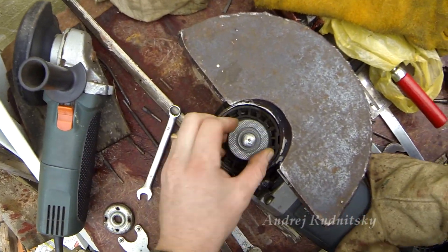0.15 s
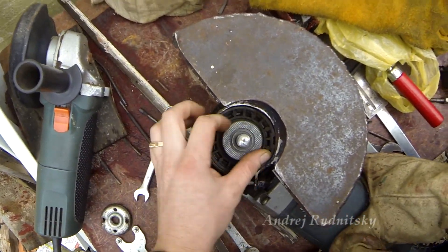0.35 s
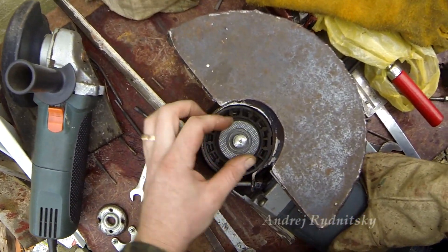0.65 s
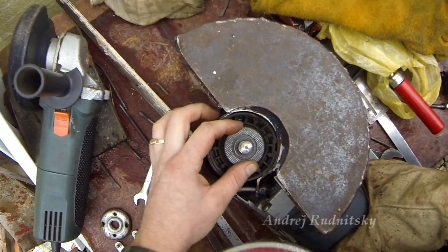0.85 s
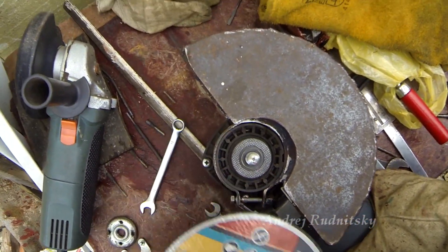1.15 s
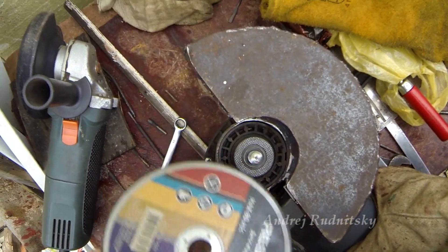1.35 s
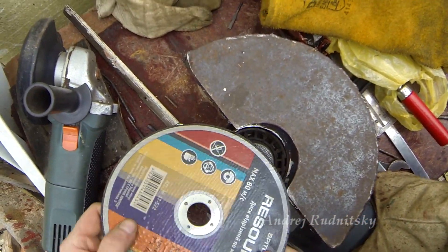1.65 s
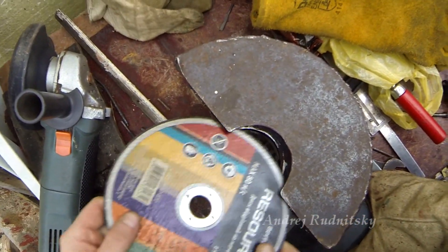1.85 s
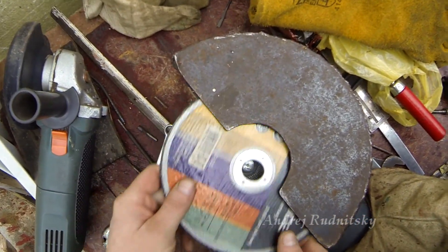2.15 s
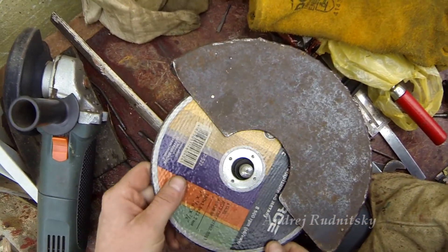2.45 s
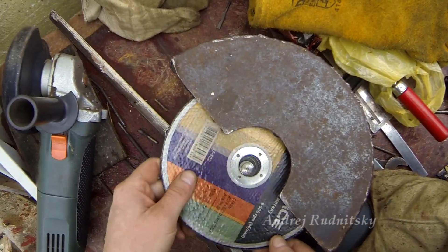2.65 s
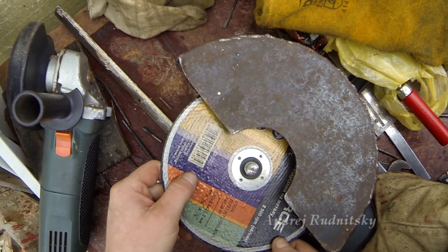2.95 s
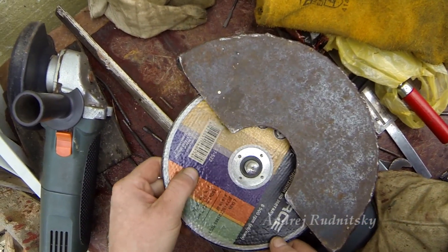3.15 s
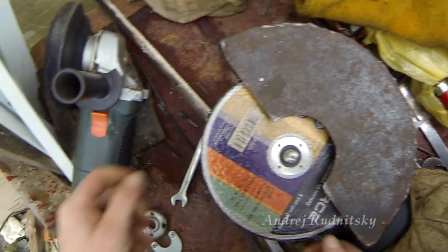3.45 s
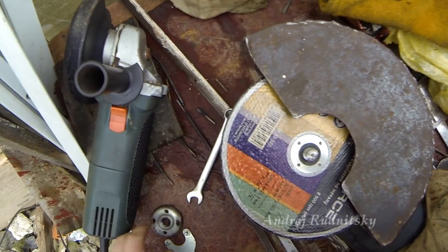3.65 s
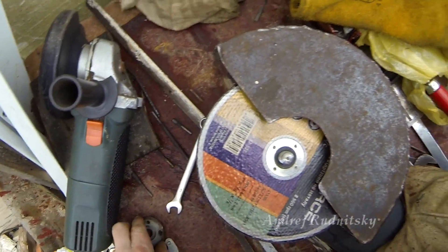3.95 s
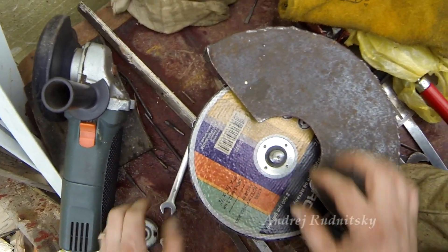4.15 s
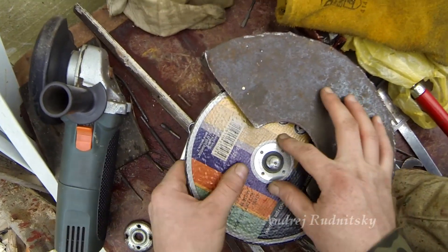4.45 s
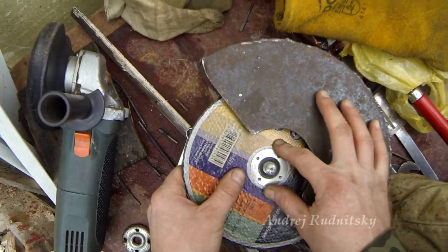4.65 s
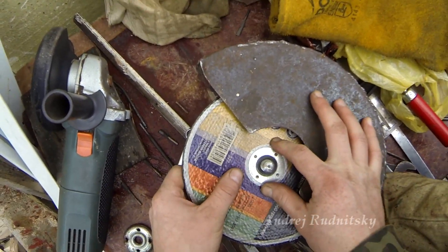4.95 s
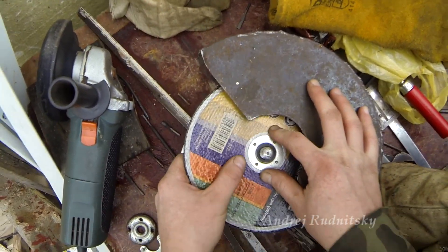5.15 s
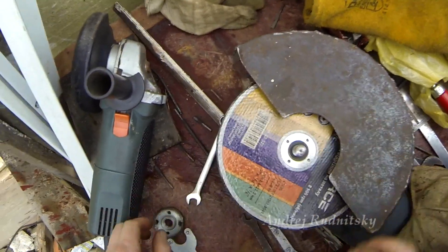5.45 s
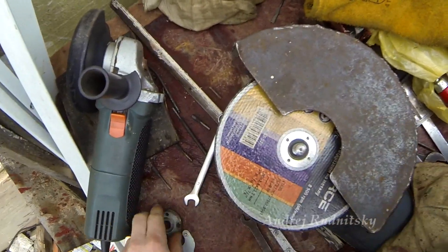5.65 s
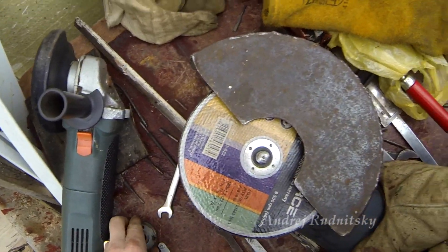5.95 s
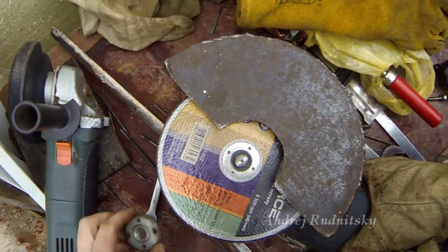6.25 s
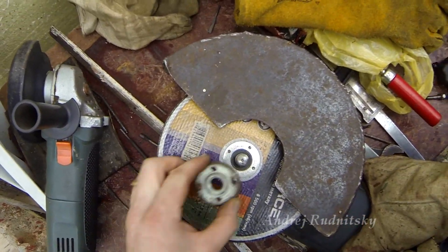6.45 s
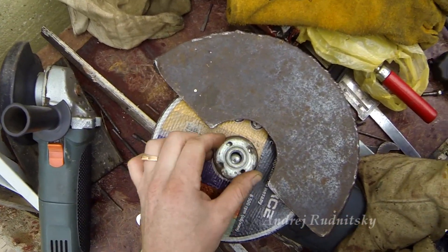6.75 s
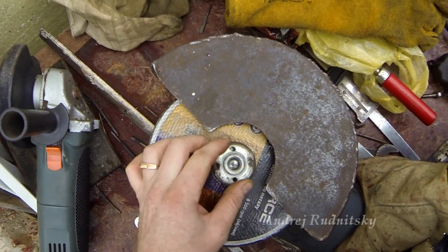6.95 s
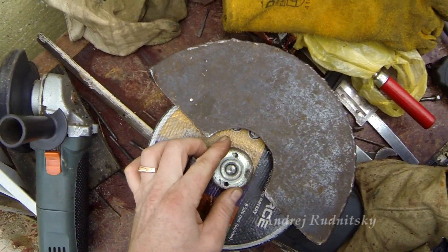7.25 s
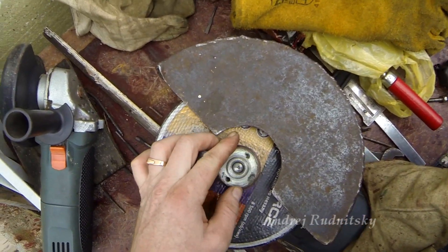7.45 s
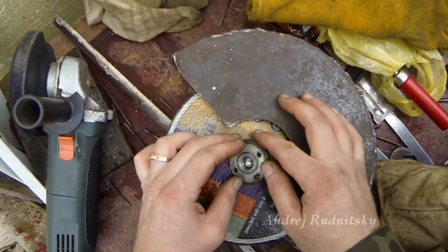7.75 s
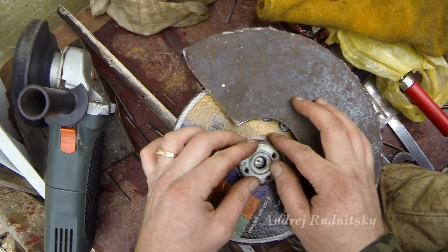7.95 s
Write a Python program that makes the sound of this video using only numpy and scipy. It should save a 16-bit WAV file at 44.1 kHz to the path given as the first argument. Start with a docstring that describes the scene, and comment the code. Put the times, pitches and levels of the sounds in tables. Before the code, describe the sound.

Close up, a steel flange clinks onto a grinder spindle, a cutting disc scrapes and snaps into place, then a nut rattles on.

```python
"""A steel flange clinks onto an angle grinder's spindle, heard from close by; the tool lies on a bench.
A cutting disc scrapes in under the guard and snaps onto its seat; a nut is picked up and turned on.
Blows are noisy force pulses through short resonances, most with a ringing sheet-steel guard; rubs are
dense random slips through resonances. Rattle, cloth, a short room tail, air, hum and whine are added.
"""
import sys
import numpy as np
from scipy import signal
from scipy.fft import rfft, irfft, next_fast_len
from scipy.io import wavfile
from scipy.ndimage import map_coordinates

SR = 44100
rng = np.random.default_rng(int(sys.argv[2]) if len(sys.argv) > 2 else 0)


def master(y):
    """Save y as 16-bit WAV."""
    cut = np.clip(np.atleast_2d(y).T, -1, 1)
    pcm = np.round(cut * 32767)  # scale
    wavfile.write(sys.argv[1], SR, pcm.astype(np.int16))


N = 357651
RING_TIME_S = np.arange(SR // 2) / SR


def amp(db):
    """Decibels to gain."""
    return 10 ** (np.asarray(db) / 20)


def unit(x):
    """Scale to rms 1."""
    return x / np.sqrt(np.mean(x ** 2) + 1e-20)


def along(points, hz):
    """Interpolate (f/Hz, value) points on a log axis."""
    f, v = np.transpose(points)
    return np.interp(np.log(hz + 1), np.log(f + 1), v)


def filtered(x, response):
    """Apply a complex response of frequency to x."""
    size = next_fast_len(len(x) + SR // 4)
    spectrum = rfft(x, size)
    return irfft(spectrum * response(np.fft.rfftfreq(size, 1 / SR)), size)[:len(x)]


def shaped_noise(curve):
    """White noise shaped by (f/Hz, level/dB) points, at rms 1."""
    return unit(filtered(rng.standard_normal(N), lambda hz: amp(along(curve, hz))))


def band(x, lo_hz, hi_hz):
    """Causal band-pass."""
    return signal.sosfilt(signal.butter(3, [lo_hz, hi_hz], "band", fs=SR, output="sos"), x)


def wobble(rate_hz):
    """Smooth random curve with rate_hz knots a second."""
    knots = rng.standard_normal(int(N * rate_hz / SR) + 4)
    return map_coordinates(knots, [np.arange(N) * rate_hz / SR])


def add(track, s, sound):
    """Mix a sound into the track at time s."""
    part = track[round(s * SR):][:len(sound)]
    part += sound[:len(part)]


# flange and nut against spindle: t/s, level/dB, hardness/dB, guard ring/dB re level
STEEL_HITS = [(0.143, -18.5, 14, -2), (0.171, -12.5, -16, -5), (0.175, -16, 9, -8), (0.22, -23, 6, -1),
              (0.231, -12.5, 7.5, -6), (0.271, -22.5, 9, 4.5), (0.29, -19.5, 24.5, 3),
              (0.298, -10, -6, -31), (0.305, -9, 18, -11.5), (0.432, -33, -59, 2.5), (0.543, -24.5, -1, -3),
              (0.676, -13.5, -3.5, -11.5), (0.693, -22, 2, -11.5), (0.805, -20.5, 8, -6),
              (0.862, -30, 2, -2), (1.016, -24, 0.5, -23), (1.032, -27, 3, -3.5), (6.634, -18, 15, -21),
              (6.649, -16, 12, -9), (6.657, -26, -11, -11), (6.802, -35, 8.5, -2.5),
              (6.846, -28, -1.5, -32), (6.907, -28.5, -23, -23), (6.991, -29.5, 2, -8),
              (7.025, -29.5, -16, -13), (7.157, -32, -20, -18), (7.333, -35, 2, -29),
              (7.453, -25.5, -19, -4), (7.791, -23.5, -34, -18), (7.901, -25.5, -4, -25),
              (8.078, -10, 1, -26)]
# flange/nut and spindle resonances: f/Hz, width/Hz, level/dB
STEEL = [(272, 98, -19.5), (462, 28, -26), (700, 82, -3.5), (806.3, 49, 5.5), (1077, 124, -16.5),
         (1294, 46, -4.5), (1567, 82, -3), (1890, 85, -8), (2275, 326, -18.5), (3640, 355, -17),
         (4120, 236, -16.5), (5050, 170, -20), (5670, 430, -28), (7370, 460, -35), (9500, 560, -40),
         (13000, 1300, -70)]
# sheet-steel guard modes: f/Hz, level/dB, t60/s
GUARD = [(447, -19, .2), (765, -4, .07), (822, 0, .16), (1141, -23, .16), (1319, -21, .18),
         (1622, -14, .15), (1930, -28, .1), (2062, -29, .16), (2234, -27, .13), (2396, -28, .13),
         (2961, -36, .16), (3300, -34, .27), (3600, -30, .15), (3770, -32, .12), (3970, -30, .11),
         (4100, -33, .13), (4500, -36, .12), (5060, -36, .14), (6950, -46, .14)]
# nut pings on the spindle tip: t/s, level/dB
PINGS = [(6.634, -41), (6.648, -38.5)]
# spindle tip modes: f/Hz, level/dB, t60/s
TIP = [(9300, 7.5, 0.017), (13100, -10, 0.051)]
SEATED_S, LOADED_RATIO = 4.7, .96  # with the disc seated, the heavier spindle rings lower


def flange_and_nut():
    """Steel on steel: bright clinks that ring the guard."""
    out = np.zeros(N)
    for s, db, hard_db, guard_db in STEEL_HITS:
        loaded = s > SEATED_S
        body = [(hz * LOADED_RATIO ** loaded, width, gain) for hz, width, gain in STEEL]
        levels = registers(thud_db=-20.5, clink_db=-6.5, tick_db=-21.5, hard_db=hard_db, clink_share=0.12)
        blow = contact(body, levels, chatter=0.25, chatter_t60_s=0.031, crack_db=-60.5, detune=0.029)
        add(out, s, amp(db) * blow)
        bright_db = min(.35 * hard_db - 2.5, -.5)
        add(out, s, amp(db + guard_db) * ring(GUARD, scatter_db=2.2, bright_db=bright_db))
    for s, db in PINGS:
        add(out, s, amp(db) * ring(TIP, scatter_db=1))
    return out


# disc against guard, spindle, fingers: t/s, level/dB, thud/dB re clank, hardness/dB, guard ring/dB re level
DISC_HITS = [(1.516, -22.5, -18, 9.5, -42), (1.603, -6, -52, -16.5, -20), (1.728, -27.5, -19, -11, 2),
             (1.74, -15, -33, -9, -13), (1.761, -26.5, -12.5, 8.5, -16), (2.211, -19.5, -7, -15, -17),
             (2.282, -29.5, 0, 11, -18), (2.312, -23, 1, 0, -8), (2.324, -24, -3.5, -6, -17),
             (2.411, -26.5, -37, -5, -15), (2.449, -21.5, -9, 1, -31), (2.515, -19, -4, -21, -22),
             (2.525, -12.5, -7, 3, -15.5), (2.56, -25.5, -10, 1, -16), (2.604, -10, -18.5, 11.5, -16.5),
             (2.64, -17, -16, 8.5, -7), (2.664, -19.5, -1.5, -3.5, -10), (2.695, -20.5, -12, -2.5, -7.5),
             (2.708, -26.5, -5, -29, 5), (2.953, -32.5, -8, -1, -28), (2.995, -32.5, -7.5, -18, -0.5),
             (3.151, -43, -13, 12.5, 0), (3.368, -23, -35, -0.5, -3.5), (4.402, -36.5, -7, 1, -3.5),
             (4.442, -30, -12.5, -12, -20), (4.458, -37, -12, 5, -20), (4.488, -41.5, -10, -9, -20),
             (4.522, -42.5, -9, -10, -7), (4.565, -46, -12, 12.5, -20), (4.802, -28, -38, -4, -26),
             (4.88, -41.5, -19, -17.5, -17), (4.984, -34, -14, 12.5, -25), (5.104, -36, -35, 5, -14)]
# disc resonances: f/Hz, width/Hz, level/dB
DISC = [(115.6, 5.4, -10.5), (273, 47, -21), (400.8, 73, -11.5), (723, 125, 4.5), (778.5, 76.4, 8),
        (1040, 94, -12.5), (1320, 110, -10.5), (1620, 97, -9), (1935, 92, -18), (2303, 64, -20),
        (3600, 200, -16.5), (3970, 73, -14), (5350, 570, -29), (7020, 310, -33), (9850, 1600, -43.5),
        (12000, 970, -58.5)]
# disc resonances shift, sinking overall, as it slides in: t/s, frequency ratio
SINK = [(1.862, 1.05), (1.98, 0.98), (2.098, 0.99), (2.169, 1.034), (2.3, .93), (2.5, 0.92)]
KNOCK_SINK_SHARE = .35  # exponent on that ratio for the knocks
# disc snaps onto its seat under both thumbs: t/s, level/dB, hardness/dB, guard ring/dB re level
SNAP = [(4.703, -2.5, -10.5, -13.5), (4.7054, -5, 14, -7)]
# pressed hard, the disc is damped: f/Hz, width/Hz, level/dB
PRESSED = [(130.4, 50, -17), (400, 110, -5), (563, 160, -3), (700, 130, 1), (876, 210, -3.5),
           (960, 121, -2.5), (1530, 122, -0.5), (2003, 410, -11), (2400, 51, -2.5), (3800, 500, -15),
           (4200, 370, -12), (5154, 200, -27), (6900, 480, -36), (10200, 830, -30), (11870, 900, -40.5)]
# disc edge catches the guard's lip: t/s, level/dB
CATCHES = [(2.323, -53), (2.605, -29)]
# lip modes: f/Hz, level/dB, t60/s
LIP = [(2150, -13, 0.23), (3360, 1.5, 0.048), (7100, -18, 0.11), (10650, -28, 0.12)]
# whole tool rocks on the bench: t/s, level/dB
JOLTS = [(2.607, -33), (4.704, -25.5)]
# rocking modes: f/Hz, level/dB, t60/s
ROCKING = [(110, -9.5, 0.34), (133, 8.5, 0.135), (137, 0.5, 0.249)]


def disc_knocks():
    """The resin disc knocks more drily, catches the guard's lip and rocks the tool as it seats."""
    out = np.zeros(N)
    for s, db, thud_db, hard_db, guard_db in DISC_HITS:
        ratio = np.interp(s, *np.transpose(SINK)) ** KNOCK_SINK_SHARE
        body = [(hz * ratio, width, gain) for hz, width, gain in DISC]
        levels = registers(thud_db, clink_db=-10.0, tick_db=-24.5, hard_db=hard_db, clink_share=0.68)
        blow = contact(body, levels, chatter=0.16, chatter_t60_s=0.036, crack_db=-46.0, detune=0.037)
        add(out, s, amp(db) * blow)
        bright_db = min(.5 * hard_db - 5, -3)
        add(out, s, amp(db + guard_db) * ring(GUARD, scatter_db=1.5, bright_db=bright_db))
    for s, db, hard_db, guard_db in SNAP:
        levels = registers(thud_db=-11.5, clink_db=-7.0, tick_db=-20.0, hard_db=hard_db, clink_share=0.68)
        blow = contact(PRESSED, levels, chatter=0.46, chatter_t60_s=0.017, crack_db=-45.5, detune=0.03)
        add(out, s, amp(db) * blow)
        add(out, s, amp(db + guard_db) * ring(GUARD, scatter_db=1, bright_db=-9))
    for s, db in CATCHES:
        add(out, s, amp(db) * ring(LIP, scatter_db=1))
    for s, db in JOLTS:
        add(out, s, amp(db) * ring(ROCKING, scatter_db=1))
    return out


def ring(modes, scatter_db, bright_db=0):
    """Decaying modes, at new strengths for each blow; bright_db tilts those above 900 Hz."""
    hz, db, t60_s = np.transpose(modes)[:, :, None]
    tilt_db = bright_db * np.clip(np.log2(hz / 900), 0, 1)
    db = db + scatter_db * rng.standard_normal(hz.shape) + tilt_db
    cycles = hz * RING_TIME_S + rng.random(hz.shape)
    swell = 1 - np.exp(-RING_TIME_S / 0.0019)
    return swell * np.sum(amp(db - 60 * RING_TIME_S / t60_s) * np.sin(2 * np.pi * cycles), axis=0)


def registers(thud_db, clink_db, tick_db, hard_db, clink_share):
    """Thud, clank, clink, tick levels: hardness raises the tick, and the clink by a share of that."""
    return [thud_db, 0, clink_db + clink_share * hard_db, tick_db + hard_db]


# thud, clank, clink, tick: from f/Hz, to f/Hz
REGISTERS = [(60, 490), (660, 1150), (1350, 2600), (3100, 15000)]


def contact(body, levels_db, chatter, chatter_t60_s, crack_db, detune, size=8192):
    """One blow and its micro-bounces through the body, each register weighted to its level."""
    t, hz = RING_TIME_S[:size], np.fft.rfftfreq(size, 1 / SR)
    bounces = rfft(chatter * rng.standard_normal(size) * amp(-60 * t / chatter_t60_s))
    force = 1 + bounces * 1j * hz / (1j * hz + 2000)  # small, hard bounces carry little bass
    # the grip moves the resonances
    gripped = [(c * np.exp(detune * rng.standard_normal()), w, db) for c, w, db in body]
    blow = force * resonant(hz, gripped, crack_db)
    weights = []
    for (lo, hi), db in zip(REGISTERS, levels_db):
        peak_db = 20 * np.log10(np.abs(irfft(blow * ((hz > lo) & (hz < hi)))).max())
        weights += [(lo, db - peak_db), (hi, db - peak_db)]
    sound = irfft(blow * causal(amp(along(weights, hz))))
    return sound * np.cos(np.pi / 2 * t / t[-1]) ** 2


def resonant(hz, modes, leak_db):
    """Causal response of (f/Hz, width/Hz, level/dB) resonances of alternating sign over a flat leak."""
    response = amp(leak_db)
    for k, (c, w, db) in enumerate(modes):
        response = response + (-1) ** k * amp(db) * 1j * hz * w / (c * c - hz * hz + 1j * hz * w)
    return response


def causal(gain):
    """Minimum-phase response with this gain, by folding the cepstrum."""
    cepstrum = irfft(np.log(gain + 1e-9))
    half = len(cepstrum) // 2
    cepstrum[1:half] *= 2
    cepstrum[half + 1:] = 0
    return np.exp(rfft(cepstrum))


# disc face under the guard: t/s, body level/dB, grit level/dB, before SLIDE_GAIN_DB
DISC_SLIDE = [(1.84, -75, -77), (1.86, -50, -59), (1.91, -35, -34), (1.924, -39, -44),
              (2.018, -33.5, -36.5), (2.162, -23, -41), (2.254, -29, -37), (2.262, -27.5, -49),
              (2.284, -29.5, -29), (2.294, -33.5, -45.5), (2.328, -25, -37), (2.37, -60, -61)]
# pushes bringing it over the spindle: t/s, hold/s, level/dB before SLIDE_GAIN_DB, grit/dB re level
NUDGES = [(2.402, 0.085, -33.5, -11.5), (2.485, .03, -39, -13.5)]
# sliding disc resonances: f/Hz, width/Hz, level/dB
DISC_RUB = [(115, 38, -18), (342, 36, -6), (451, 36, -5), (739, 48, 7), (910, 52, -7.5), (1028, 28, -2),
            (1326, 36, -13.5), (1550, 29, -23), (1932, 73, -11), (2150, 45, -21), (2400, 97, -27),
            (3280, 70, -26), (4020, 150, -34), (4400, 74, -33), (5200, 100, -35), (7200, 170, -43),
            (8600, 250, -38), (12000, 2000, -55)]
# flange, disc bore, then nut on spindle: t/s, hold/s, level/dB before GRIND_GAIN_DB, grit/dB re level
TURNS = [(0.163, .01, -30.5, -1), (0.195, .025, -41, 6), (0.245, 0.05, -38, -2), (2.65, .008, -29, -28),
         (2.698, 0.0029, -26.5, -5.5), (2.878, 0.11, -41.5, -8.5), (2.996, 0.005, -42, -14),
         (3.06, 0.1, -43.5, -10.5), (6.665, 0.07, -36, 0), (6.88, 0.015, -39, -2),
         (6.91, 0.0027, -31.5, -12.5), (7.028, 0.017, -28.5, -7.5), (7.06, 0.052, -39.5, -8.5),
         (7.165, 0.054, -43, -6.5), (7.252, 0.0034, -38, -5.5), (7.345, 0.022, -44, -10),
         (7.716, 0.01, -42, -7.5), (7.783, 0.026, -34, -6), (7.9, 0.0069, -27, -4.5),
         (8.003, 0.0027, -45.5, -7), (8.03, .03, -48, -3.5), (8.074, 0.025, -28, -1.5)]
# rubbed spindle resonances: f/Hz, width/Hz, level/dB
SPINDLE_RUB = [(611, 41, -6), (731, 111, -7.5), (818, 10.4, 6), (1032, 48, -12.5), (1370, 180, -15),
               (1615, 204, -3.5), (1693, 245, -6.5), (2032, 58, -18), (3430, 100, -42), (5030, 1800, -48)]
SLIDE_GAIN_DB, GRIND_GAIN_DB = -0.6, 3
SLIDE_SAND_DB, GRIND_SAND_DB = -8.5, -3  # fine grains over the rasp


def scrapes():
    """The abrasive disc slides under the guard; flange, bore and nut grind round on the spindle."""
    t = np.arange(N) / SR
    s, *levels_db = np.transpose(DISC_SLIDE)
    push_db = np.array([np.interp(t, s, db) for db in levels_db])
    push = amp(push_db) * (t > s[0]) * (t < s[-1]) + strokes(NUDGES)
    sink = np.interp(t, *np.transpose(SINK))
    slide = friction(push, DISC_RUB, leak_db=-85, judder_db=1.6, grit_db=4,
                     sand_db=SLIDE_SAND_DB, ratio=sink)
    grind = friction(strokes(TURNS), SPINDLE_RUB, leak_db=-85, judder_db=2.8, grit_db=1.5,
                     sand_db=GRIND_SAND_DB, ratio=np.ones(N))
    return amp(SLIDE_GAIN_DB) * slide + amp(GRIND_GAIN_DB) * grind


BITE_DB_PER_S, SAG_DB_PER_S, RELEASE_DB_PER_S = 1298, 129, 621


def strokes(rows):
    """Gains of body and grit for short rubs: fast bite, sagging hold, release."""
    t, gains = np.arange(N) / SR, np.zeros((2, N))
    for s, hold_s, db, grit_db in rows:
        age_s = t - s
        fall_db = BITE_DB_PER_S * np.maximum(-age_s, 0)
        fall_db += SAG_DB_PER_S * np.clip(age_s, 0, hold_s)
        fall_db += RELEASE_DB_PER_S * np.maximum(age_s - hold_s, 0)
        gains = np.maximum(gains, amp([[db], [db + grit_db]]) * amp(-np.minimum(fall_db, 200)))
    return gains


# coarse to fine abrasive: from f/Hz, to f/Hz, level/dB re the rub in that band
GRAINS = [(2700, 5100, 5), (4600, 7000, -2.5), (6270, 9000, -2), (9000, 12000, -4.5)]


def friction(gains, body_modes, leak_db, judder_db, grit_db, sand_db, ratio):
    """Dense irregular slips ring the rubbed parts, shifted by ratio; each grain size catches on its own."""
    slips = (rng.random(N) < 1200 / SR) * rng.standard_normal(N)  # 1200 a second on average
    force = (unit(slips) + 0.7 * rng.standard_normal(N)) * amp(judder_db * wobble(130))
    rub = filtered(force, lambda hz: resonant(hz, body_modes, leak_db))
    moved = map_coordinates(rub, [np.cumsum(ratio)], mode="wrap")  # variable-speed read
    body, rasp = band(moved, 60, 1250), band(moved, 1250, 2800)
    sand = np.zeros(N)
    for lo, hi, db in GRAINS:
        sand += amp(db) * band(moved, lo, hi) * unit(amp(grit_db * wobble(160)))
    return gains[0] * unit(body) + gains[1] * unit(rasp + amp(sand_db) * sand)


# loose guard rattles after three hard blows: t/s, level/dB
RATTLES = [(0.306, -35), (2.606, -34.5), (4.705, -33)]
# rattle spectrum: f/Hz, level/dB
RATTLE = [(300, -19), (900, 1), (1600, -0.5), (2400, 0.5), (2900, -13.5), (3700, -10), (4600, -12.5),
          (6000, -28.5), (15000, -44)]
RATTLE_T60_S = .17


def rattle():
    """Dense, quickly dying chatter of the guard on its collar: flickering shaped noise."""
    t = np.arange(N) / SR
    fading = sum(amp(db - 60 * np.clip(t - s, 0, 1) / RATTLE_T60_S) * (t > s) for s, db in RATTLES)
    return fading * amp(1.77 * wobble(150)) * shaped_noise(RATTLE)


# fingers and nut on the bench: t/s, level/dB, thud/dB re clank, hardness/dB
BENCH_HITS = [(3.884, -33.5, -6, -5), (3.896, -31, -16, -0.5), (3.912, -24, -14, -7),
              (3.929, -37.5, -21, 1), (4.07, -42, -2, 0), (4.096, -45, 7.5, 7), (5.766, -36.5, -2.5, 1.5),
              (5.832, -44, -17, 14), (6.121, -45.5, 2.5, -3), (6.149, -51, 4, 1), (6.212, -38, -7, -5),
              (6.22, -31.5, -14, -6)]
# bench resonances: f/Hz, width/Hz, level/dB
BENCH = [(254, 110, -4), (361, 37, 6), (534, 130, -4.5), (675, 87, 6), (966, 77, 2), (1700, 180, -1.5),
         (2080, 150, -26), (3730, 190, 9.5)]
# lifted nut rings freely: t/s, level/dB
LIFT = [(6.212, -56)]
# nut modes: f/Hz, level/dB, t60/s
NUT = [(915, 7.5, 0.47), (6700, -15, 0.24), (11000, -9, 0.12)]


def bench():
    """Dull taps as the hand gropes for the nut, and a faint ring as it comes free."""
    out = np.zeros(N)
    for s, db, thud_db, hard_db in BENCH_HITS:
        levels = registers(thud_db, clink_db=-8.5, tick_db=-19, hard_db=hard_db, clink_share=0.71)
        blow = contact(BENCH, levels, chatter=0.65, chatter_t60_s=0.034, crack_db=-16, detune=0.056)
        add(out, s, amp(db) * blow)
    for s, db in LIFT:
        add(out, s, amp(db) * ring(NUT, scatter_db=1))
    return out


# hands and sleeves brushing past: middle t/s, length/s, level/dB
SWISHES = [(1.329, .4, -61.5), (3.636, .35, -67.5), (4.326, .4, -61.5), (5.528, .5, -62.5),
           (7.7, .35, -59.5)]
# cloth spectrum: f/Hz, level/dB
CLOTH = [(200, -22), (700, -4), (1400, -1.5), (1900, 1.5), (3000, -13), (6000, -22.5), (15000, -36.5)]


def sleeves():
    """Cloth and skin swish softly: shaped noise swelling and fading with each reach of the hand."""
    t = np.arange(N) / SR
    swell = sum(amp(db) * np.exp(-(2 * (t - s) / length_s) ** 2) for s, length_s, db in SWISHES)
    return swell * amp(1.4 * wobble(25)) * shaped_noise(CLOTH)


# room decay: f/Hz, t60/s
ROOM = [(150, 0.12), (1000, 0.22), (4000, 0.052), (12000, 0.03)]


def room(x):
    """A cluttered room gives a short, dull tail: decaying noise, 5 ms late."""
    hz, t, z = signal.stft(rng.standard_normal(SR // 2), SR, nperseg=256)
    decay = amp(-60 * t / along(ROOM, hz)[:, None])
    tail = signal.istft(z * decay, SR, nperseg=256)[1]
    return signal.fftconvolve(x, np.pad(tail, (SR // 200, 0)) / np.linalg.norm(tail))[:N]


# air and hiss spectrum: f/Hz, level/dB
AIR = [(20, -12), (58, -1), (90, -6), (160, -14.5), (230, -17.5), (380, -23), (720, -19), (1200, -27),
       (1900, -31.5), (3000, -39.5), (7000, -49), (9600, -42.5), (11300, -56), (15000, -53.5)]
# faint tones of drifting phase: f/Hz, rms level/dB
HUM = [(52, -60), (158, -64.5)]


def background():
    """Quiet workshop air, hiss, a faint hum and a thin whine pulsing at 30 Hz."""
    t = np.arange(N) / SR
    air = amp(-49.5 + 1.2 * wobble(2.2)) * shaped_noise(AIR)
    hum = sum(amp(db) * unit(np.sin(2 * np.pi * hz * t + 2.2 * wobble(1))) for hz, db in HUM)
    pulse = 1 + np.sin(2 * np.pi * 30 * t)
    whine = amp(-82.5) * unit(np.sin(2 * np.pi * 5690 * t + .7 * wobble(120)) * pulse)
    return air + hum + whine


def scene():
    """All the handling, close up, in the quiet workshop."""
    handling = flange_and_nut() + disc_knocks() + scrapes() + rattle() + bench() + sleeves()
    return (handling + amp(-28.5) * room(handling) + background())[None]


TOP_HZ = 15200


def record(dry):
    """Soft saturation near full scale, then a steep low-pass at TOP_HZ."""
    squeezed = dry[0] / (1 + np.abs(dry[0]) ** 6) ** (1 / 6)
    return filtered(squeezed, lambda hz: 1 / (1 + (hz / TOP_HZ) ** 120))[None]


dry = scene()
out = record(dry)
master(out)
```